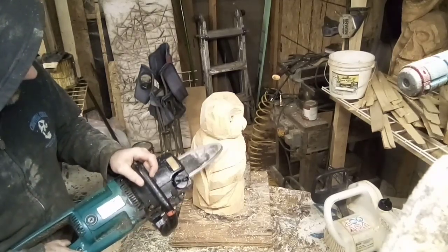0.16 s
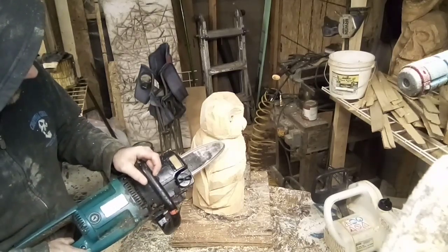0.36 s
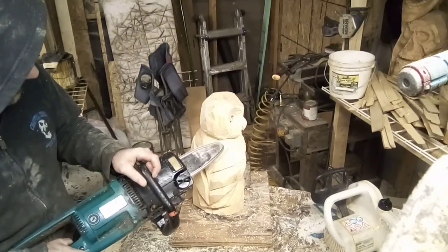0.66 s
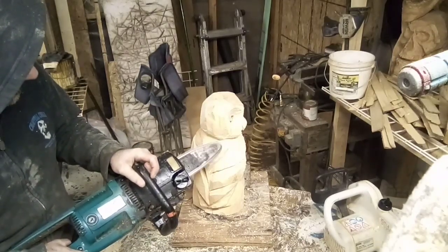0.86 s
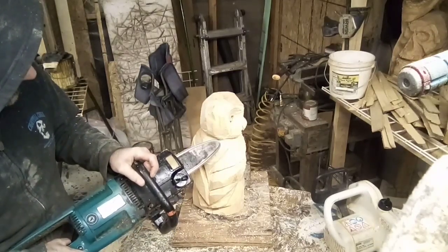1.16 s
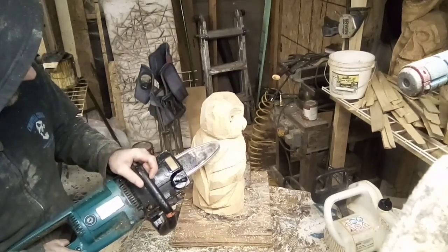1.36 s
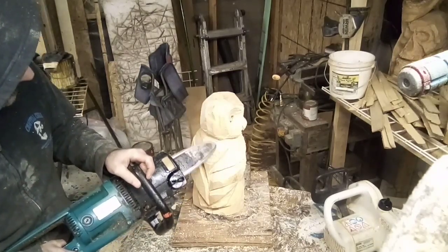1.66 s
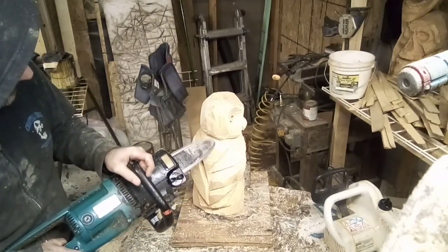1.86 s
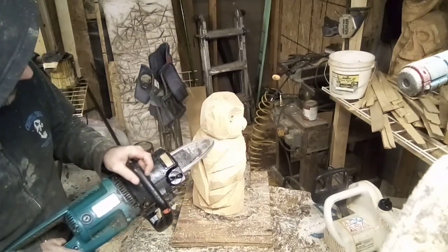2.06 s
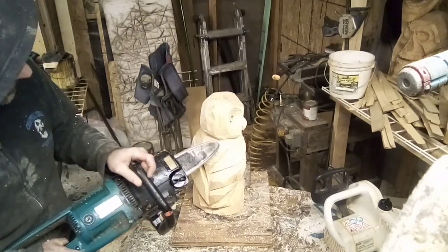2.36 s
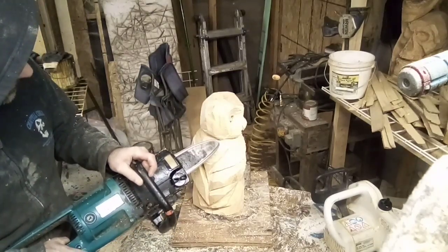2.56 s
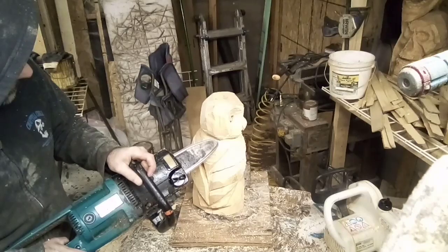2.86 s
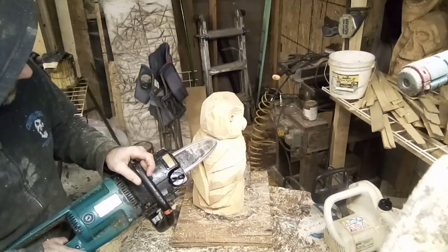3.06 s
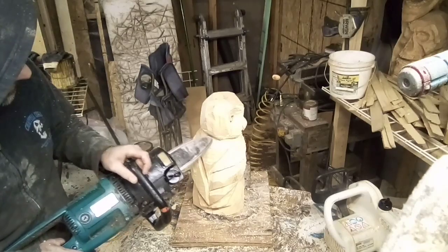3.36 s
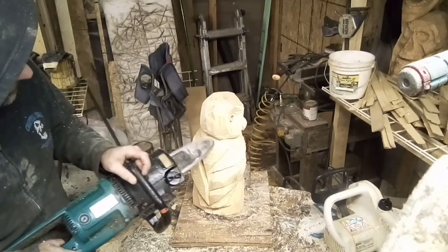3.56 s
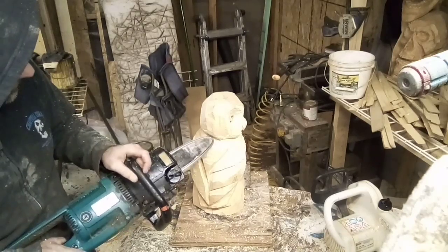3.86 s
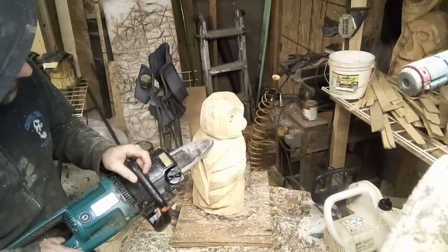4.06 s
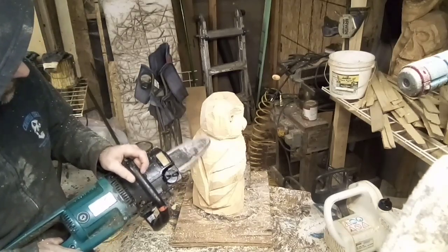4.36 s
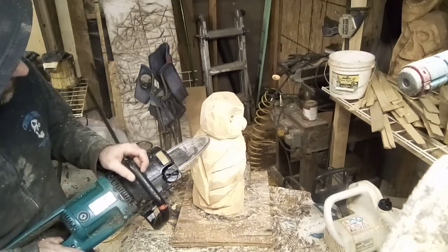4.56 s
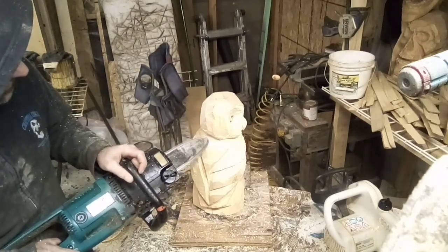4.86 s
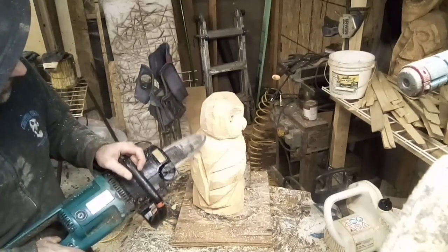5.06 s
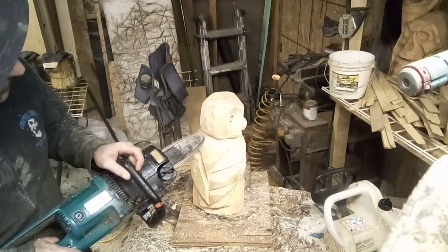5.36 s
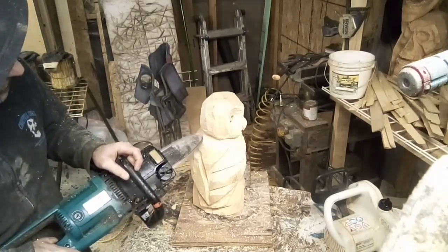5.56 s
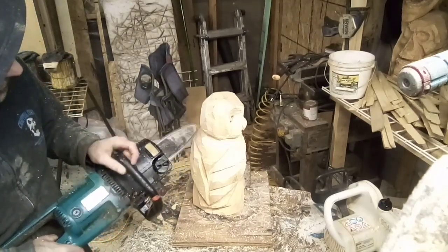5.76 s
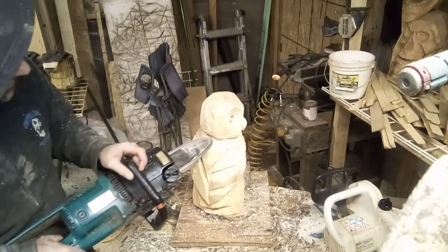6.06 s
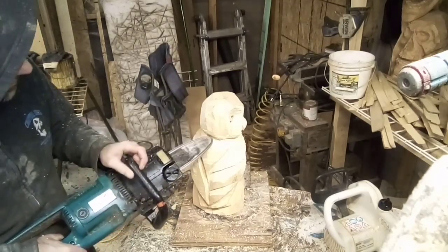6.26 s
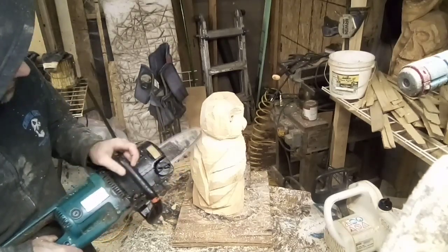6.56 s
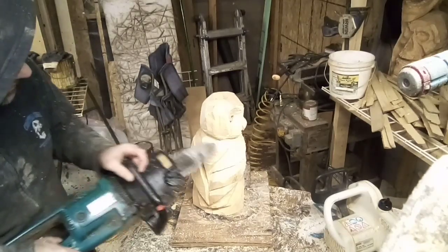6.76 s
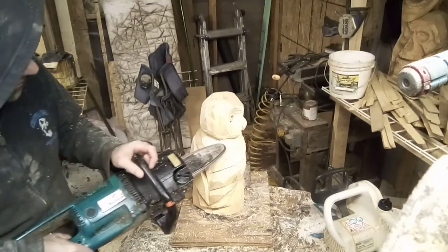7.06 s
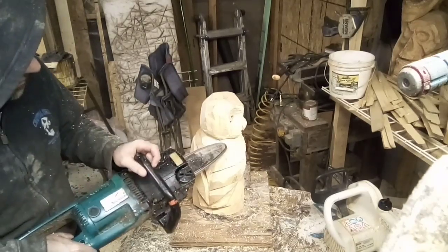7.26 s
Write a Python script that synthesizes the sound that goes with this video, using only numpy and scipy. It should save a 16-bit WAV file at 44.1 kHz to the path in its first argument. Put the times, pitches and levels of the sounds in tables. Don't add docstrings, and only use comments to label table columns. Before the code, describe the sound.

Close, steady electric carving saw noise: gritty gear roar, hissing chain and a faint steady whine, wavering slightly as the hands shift.

```python
import sys
import numpy as np
from scipy import signal
from scipy.fft import rfft, irfft
from scipy.io import wavfile
from scipy.ndimage import uniform_filter1d, map_coordinates

SR = 44100
rng = np.random.default_rng(int(sys.argv[2]) if len(sys.argv) > 2 else 0)


def elevation(decibels):
    levels = np.asarray(decibels, float)
    return 10 ** (levels / 20)


def output_pcm(signal):
    pcm = np.clip(np.atleast_2d(signal).T, -1, 1) * 32767
    wavfile.write(sys.argv[1], SR, np.round(pcm).astype(np.int16))


N = 326781


def unit(x):
    return x / np.sqrt(np.mean(x ** 2) + 1e-20)


def seconds():
    return np.arange(N) / SR


def wobble(rate_hz, size=N):
    knots = rng.standard_normal(int(N * rate_hz / SR) + 4)
    at_s = np.arange(size) * (N / size) / SR
    return map_coordinates(knots, [at_s * rate_hz])


def swells(rows):
    t = np.arange(0, N, 64) / SR
    level_db = 0
    for centre_s, peak_db, length_s in rows:
        level_db = level_db + peak_db * np.exp(-np.log(16) * ((t - centre_s) / length_s) ** 2)
    return np.interp(seconds(), t, level_db)


def patches(shape, bins, frames):
    smooth = uniform_filter1d(rng.standard_normal(shape), bins, 0)
    return unit(uniform_filter1d(smooth, frames, 1))


# centre_hz, width_hz, start_db (opposite sign at the end)
TILT = [(860, 70, 2), (4545, 60, 2.5), (4740, 110, -2)]


def through(drive, spectrum, modes, sway, comb_db, patchy_db):
    hz, t, z = signal.stft(drive, SR, nperseg=4096)

    def bump(centre_hz, width_hz):
        return np.exp(-np.log(16) * ((hz - centre_hz) / width_hz) ** 2)

    f, db = np.transpose(spectrum)
    gain_db = np.interp(np.log(hz + 1), np.log(f), db)[:, None] + 0 * t
    for centre_hz, width_hz, peak_db in modes:
        gain_db += peak_db * np.outer(bump(centre_hz, width_hz), 1 + sway * wobble(2.06, size=len(t)))
    for centre_hz, width_hz, lean_db in TILT:
        gain_db += lean_db * np.outer(bump(centre_hz, width_hz), 1 - 2 * t / t[-1])
    gain_db += comb_db * (patches(z.shape, 3, 10) + .6 * patches(z.shape, 7, 24))
    body = signal.istft(z * elevation(gain_db), SR, nperseg=4096)[1][:N]

    z = signal.stft(body, nperseg=512)[2]
    patchy = z * elevation(patchy_db * patches(z.shape, 8, 10))
    return unit(signal.istft(patchy, nperseg=512)[1][:N])


def links(per_second, spread_db):
    chance, sign, strength = rng.random((3, N))
    struck = chance < per_second / SR
    return unit(struck * np.sign(sign - .5) * elevation(-spread_db * np.log(strength + .02)))


# time_s, shaft_hz
SPEED = [(0.0, 387.0), (0.55, 390.0), (1.3, 389.2), (1.95, 387.5), (2.55, 391.0), (3.0, 390.1),
         (3.4, 388.2), (3.9, 390.5), (4.6, 388.9), (4.8, 389.0), (5.2, 388.2), (5.6, 388.5), (6.15, 391.2),
         (6.6, 389.6), (7.2, 392.6), (7.41, 391.9)]


def shaft():
    time_s, speed_hz = np.transpose(SPEED)
    hz = np.interp(seconds(), time_s, speed_hz)
    return hz, 2 * np.pi * np.cumsum(hz) / SR


def buzz():
    turn = shaft()[1]
    turns_per_beat = 3.05
    sprocket = np.sin(turn / turns_per_beat + .4 * wobble(4))
    return sprocket + .6 * np.sin(turn + .4 * wobble(4))


# centre_s, peak_db, length_s
SWINGS = [(0.5, -1.5, 0.1), (0.85, -0.5, 0.13), (1.24, 0, .12), (1.97, 0.3, .15), (2.15, -0.5, .15),
          (2.6, -0.7, 0.22), (3.03, 1, .15), (3.17, -.8, 0.092), (3.32, 1, .12), (3.82, 0, .15),
          (4.08, -0.1, .12), (4.32, -0.3, .15), (4.47, 1.5, 0.073), (4.8, 0.8, 0.14), (5.15, 0.1, .15),
          (5.3, -1.5, 0.11), (6.0, -0.7, 0.13), (6.3, 0.3, .15), (6.7, 0, .3), (7.15, 0.2, .25),
          (7.38, 0.5, .1)]


def bar_swing_db():
    return swells(SWINGS)


# freq_hz, density_db (per Hz)
ROAR = [(60, -59.4), (150, -29.8), (230, -19.8), (330, -13), (540, -10), (640, -2.0), (1100, -2.1),
        (1500, 0.0), (2000, -2.8), (2400, -4.3), (3000, -11.7), (4000, -39.2)]
# centre_hz, width_hz, peak_db
HOUSING = [(237, 20, 2.4), (297, 53, -4.8), (360, 20, 4), (392, 40, -5), (435, 50, 2.5), (550, 17, -4.2),
           (574, 26, 5.4), (612, 15, -3.7), (654, 26, 4.6), (734, 22, -3.4), (872, 45, 3.1),
           (915, 12, -3.6), (1014, 48, 3.1), (1050, 25, -2.9), (1203, 36, 3), (1255, 53, -3.4),
           (1338, 19, 6.0), (1351, 38, -7.1), (1403, 36, 3.4), (1585, 53, 1.1), (1708, 16, -3.4),
           (1759, 66, 3.7), (1830, 44, -5.6), (1950, 49, 5.5), (2003, 33, 4.0), (2053, 38, 4.4),
           (2196, 28, -2.4), (2265, 21, 4.2), (2395, 20, 3.2), (2493, 33, -4.3)]
# centre_s, peak_db, length_s
GRIP = [(0.12, 0.6, .2), (0.95, -0.4, .4), (1.3, 1.4, .15), (1.85, -0.3, .3), (2.1, -1, 0.11),
        (2.4, 0.1, 0.17), (2.9, 0.2, 0.43), (4.07, -0.7, .12), (4.33, .8, .12), (5.0, 1.2, .3),
        (5.22, -1.2, .15), (5.5, 0.9, 0.27), (6.65, 0.6, .2), (6.8, -1.5, .1)]


def roar(rattle, flutter):
    drive = rng.standard_normal(N) + .2 * rattle
    housing = through(drive, ROAR, HOUSING, sway=.15, comb_db=.9, patchy_db=.3)
    return elevation(-26.6 + swells(GRIP) + 0.24 * flutter) * housing


# freq_hz, density_db (per Hz)
RUSH = [(1500, -39.6), (2200, -11.8), (2800, -4.7), (3600, -1.7), (4500, 0.0), (5500, -2.7), (6300, -4.0),
        (7000, -7.4), (7700, -18.3), (8400, -33.1), (10000, -59.4)]
# centre_hz, width_hz, peak_db
BAR = [(2630, 104, 2.6), (2991, 117, -1.2), (3213, 68, -1.2), (3327, 161, 1.3), (3612, 41, 1.3),
       (3737, 35, 1.1), (3787, 39, -1.1), (3915, 77, 3.7), (3991, 47, -2.0), (4078, 52, 1.0),
       (4138, 42, -2.2), (4179, 25, 0.5), (4240, 69, -1.6), (4393, 56, -2.1), (4549, 39, 1.7),
       (4734, 98, 2.0), (4904, 73, -1.4), (5034, 136, 3.5), (5138, 118, -1.2), (5354, 53, 2.8),
       (5519, 62, 2.0), (5748, 81, -1.4), (5964, 75, -0.9), (6295, 255, 3.0), (6416, 64, -2.3),
       (6648, 92, 1.8), (6927, 59, -1.5), (6955, 250, -1.2), (7381, 50, -1.7)]


def rush(rattle, flutter, beat_db, swing_db):
    drive = rng.standard_normal(N) + .5 * rattle
    bar = through(drive, RUSH, BAR, sway=.3, comb_db=1.25, patchy_db=.5)
    return elevation(-23.7 + swing_db + 0.49 * flutter + beat_db) * bar


# freq_hz, density_db (per Hz)
HISS = [(6000, -29.5), (7600, -2.5), (8300, -1.0), (10100, -2.7), (10900, 0.0), (12000, -1.3),
        (13500, -3.9), (14200, -6.8), (16000, -29.5)]


def hiss(rattle, flutter, beat_db, swing_db):
    drive = rng.standard_normal(N) + .4 * rattle
    air = through(drive, HISS, [], sway=0, comb_db=1.6, patchy_db=.7)
    return elevation(-42 + 0.58 * swing_db + 0.35 * flutter + beat_db) * air


# freq_hz, density_db (per Hz)
RING = [(12500, -41.0), (13900, -17.6), (14300, -7.1), (14750, 0.0), (15100, -2.6), (15450, -0.4),
        (15600, -0.5), (15900, -60)]
# centre_s, peak_db, length_s
SHADE = [
    (0.17, 1.5, .3),
    (5.8, -1, .6),
    (6.7, -1.8, .4),
    (7.2, 1, .4),
]


def ring(rattle, flutter, beat_db, swing_db):
    drive = rng.standard_normal(N) + .5 * rattle
    capsule = through(drive, RING, [], sway=0, comb_db=1.4, patchy_db=.8)
    aim_db = 1.6 * swing_db + swells(SHADE) + .4 * wobble(3)
    return elevation(-36.8 + aim_db + 0.69 * flutter + 2 * beat_db) * capsule


# cruise_db, speed_gain_db_per_hz, facing_gain_db
ORDERS_DB = [
    (-42.5, -0.3, 0.8),
    (-43, 1.2, 1),
    (-42, 0, 3.5),
]


def whine():
    hz, turn = shaft()
    cruise_hz, turn_s, turn_takes_s = 389.5, 2.2, .5
    slip = .12 * wobble(10)
    facing = np.clip((seconds() - turn_s) / turn_takes_s + .5, 0, 1)
    total = np.zeros(N)
    for k, (cruise_db, db_per_hz, facing_db) in enumerate(ORDERS_DB):
        level_db = cruise_db + db_per_hz * (hz - cruise_hz) + facing_db * facing + .6 * wobble(2.55)
        total += np.sqrt(2) * elevation(level_db) * np.sin((k + 1) * turn + k * slip)
    return total


PANEL_HZ = (899, 1134)
# centre_s, peak_db, length_s
SINGS = [
    (0.08, 16, .25),
    (0.7, 6, .4),
    (2.5, 6, .4),
    (3.05, 14, .5),
    (4.5, 6, .4),
    (4.95, 10, .5),
]


def panels():
    t = seconds()
    fade_db_per_s = 1
    levels_db = (-42 - fade_db_per_s * t, -50 + swells(SINGS))
    total = np.zeros(N)
    for hz, level_db in zip(PANEL_HZ, levels_db):
        level = np.sqrt(2) * elevation(level_db + 1.2 * wobble(12))
        total += level * np.sin(2 * np.pi * hz * t + 1.1 * wobble(11))
    return total


# freq_hz, density_db (per Hz)
FLOOR = [(15, -12), (30, -12), (60, -5), (90, 9), (130, 8), (170, -11.5), (260, -14.5)]
# centre_s, peak_db, length_s
THUDS = [(0.24, 9, .1), (0.77, 6, .12), (1.11, -9, .08), (1.23, 7, .15), (1.6, -14, .22), (1.88, -9, .1),
         (2.02, 4, .1), (2.77, 9, .1), (2.98, -10, .2), (3.22, 5, .1), (3.39, 8, .12), (4.06, 8, .08),
         (4.36, -7, .15), (4.52, 5, .1), (5.6, -4, .2), (5.8, 5, .15), (6.95, 7, .3), (7.3, -6, .1)]


def rumble():
    shop = through(rng.standard_normal(N), FLOOR, [], sway=0, comb_db=1.0, patchy_db=0.5)
    return elevation(-66.5 + swells(THUDS) + 1.5 * wobble(7)) * shop


def scene():
    swing_db = bar_swing_db()
    flutter = .8 * wobble(12) + .3 * wobble(25)
    rattle = links(per_second=2000, spread_db=2.3)
    beat_db = .2 * buzz()
    saw = roar(rattle, flutter)
    saw += rush(rattle, flutter, beat_db, swing_db)
    saw += hiss(rattle, flutter, beat_db, swing_db)
    saw += ring(rattle, flutter, beat_db, swing_db)
    saw += whine() + panels() + rumble()
    return np.array([saw, saw])


# start_s, low_hz, high_hz, level_db
FILLS = [(0.499, 4630, 6270, -34), (0.923, 8936, 11047, -52), (1.782, 5642, 6912, -34),
         (1.782, 12403, 13717, -56), (2.943, 4630, 5642, -36), (3.268, 5168, 6930, -34),
         (3.477, 12403, 14449, -48), (3.756, 4242, 5168, -34), (3.756, 11047, 12425, -52),
         (3.849, 6245, 7500, -39), (4.127, 5650, 7580, -36), (4.127, 11714, 13092, -53),
         (4.569, 11736, 13071, -53), (5.799, 7558, 10314, -47), (6.984, 13738, 15159, -42)]


def side_noise():
    block, offset = 1024, 692
    side = np.zeros(N)
    n = np.arange(2 * block) + (block + 1) / 2
    window = signal.windows.cosine(2 * block)
    for start_s, low_hz, high_hz, level_db in FILLS:
        start = offset + block * (round((start_s * SR - offset) / block) - 1)
        bins = np.arange(round(low_hz * 2 * block / SR), round(high_hz * 2 * block / SR))
        cosines = np.cos(np.pi / block * np.outer(n, bins + .5))
        band = cosines @ rng.standard_normal(block)[bins]
        side[start:start + 2 * block] += elevation(level_db) * unit(band) * window
    return side


def low_pass(x):
    return signal.sosfilt(signal.butter(12, 16870, fs=SR, output="sos"), x)


def record(dry):
    top_hz = 15500
    mix = dry + side_noise() * [[1], [-1]]
    passed = np.fft.rfftfreq(N, 1 / SR) < top_hz
    mix = irfft(rfft(mix) * passed, N)
    return low_pass(mix)


dry = scene()
out = record(dry)
output_pcm(out)
```